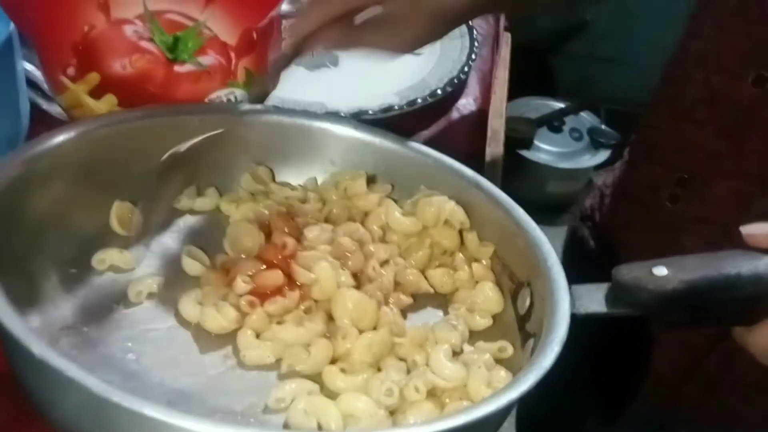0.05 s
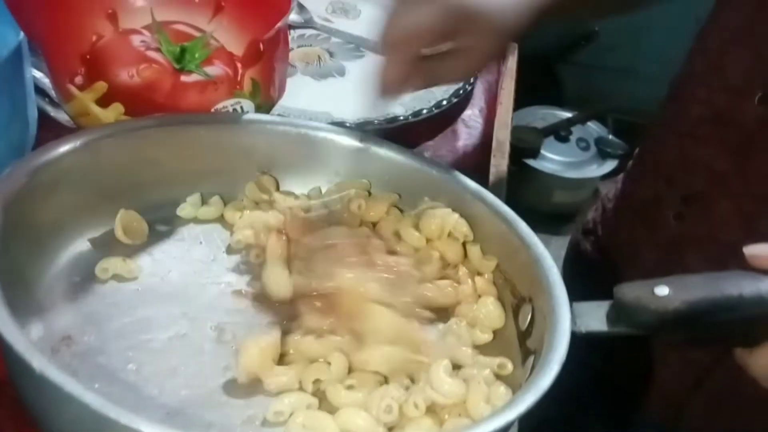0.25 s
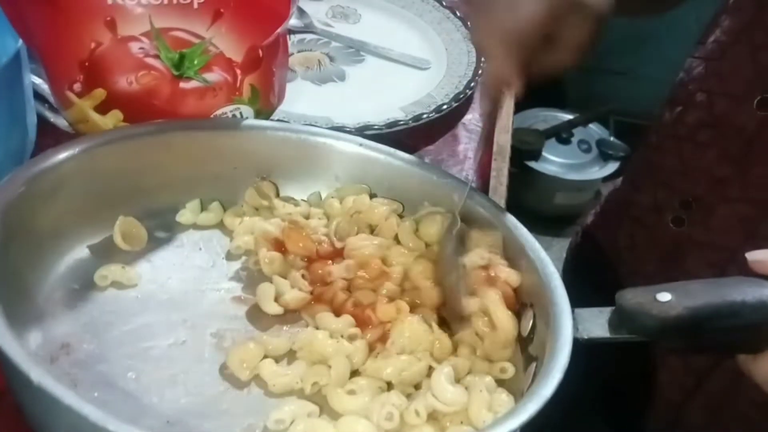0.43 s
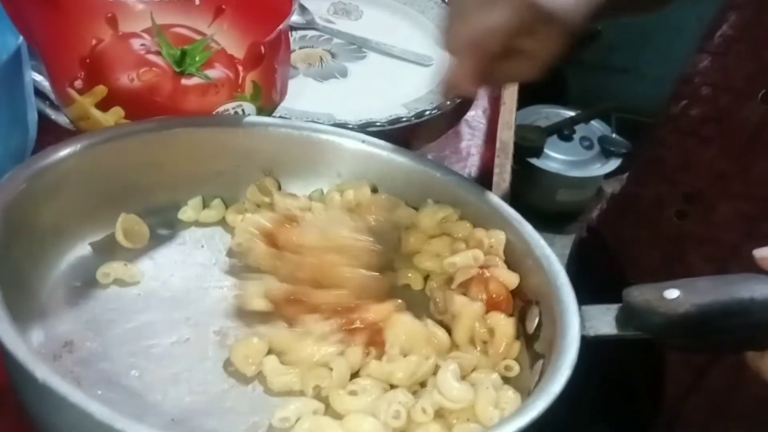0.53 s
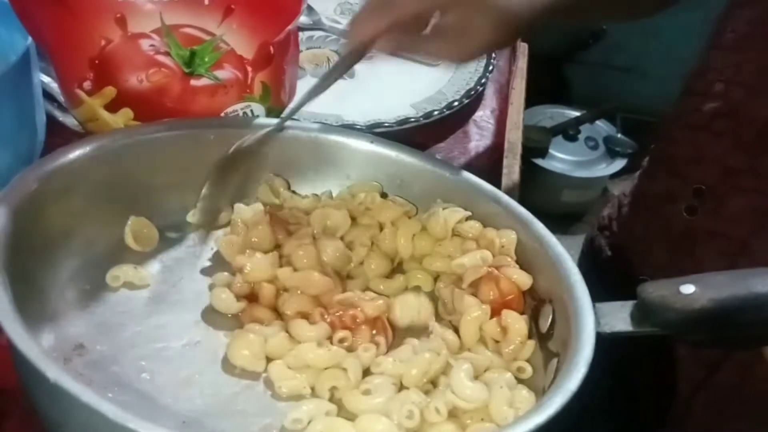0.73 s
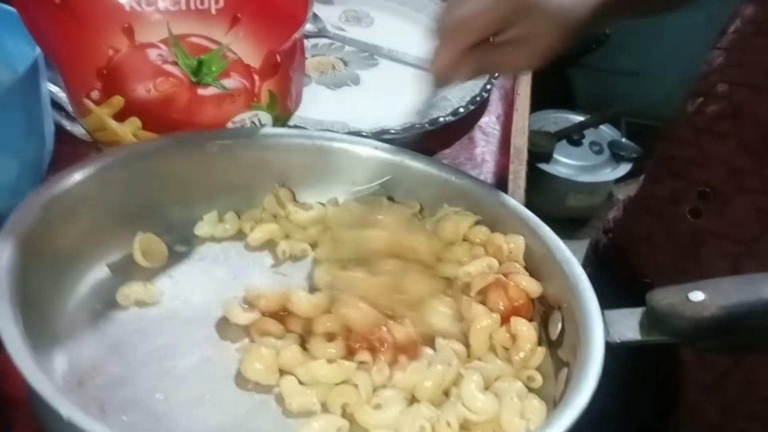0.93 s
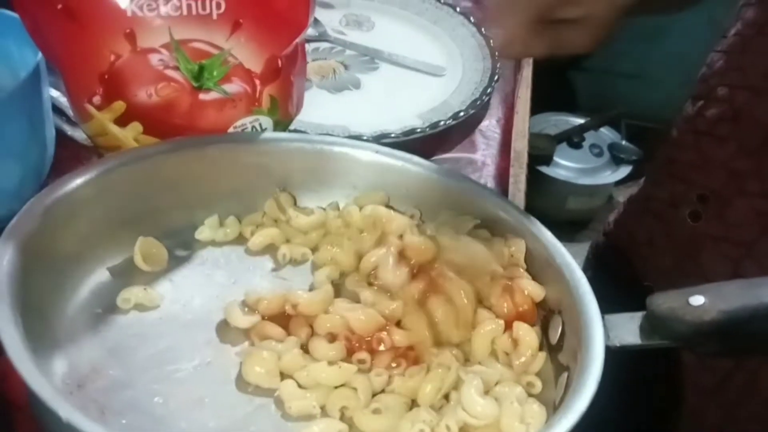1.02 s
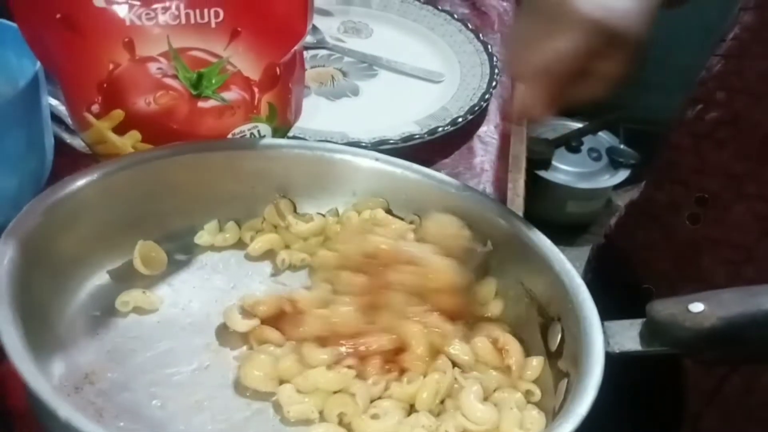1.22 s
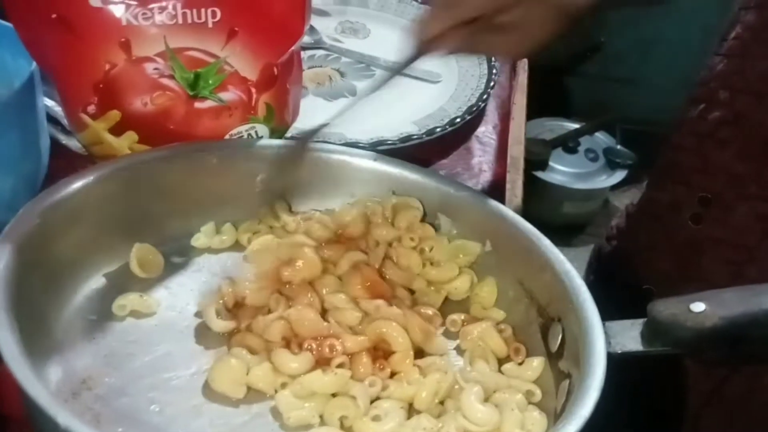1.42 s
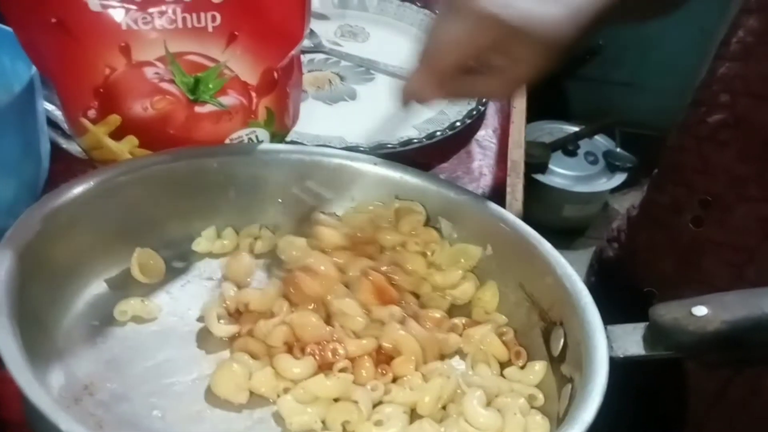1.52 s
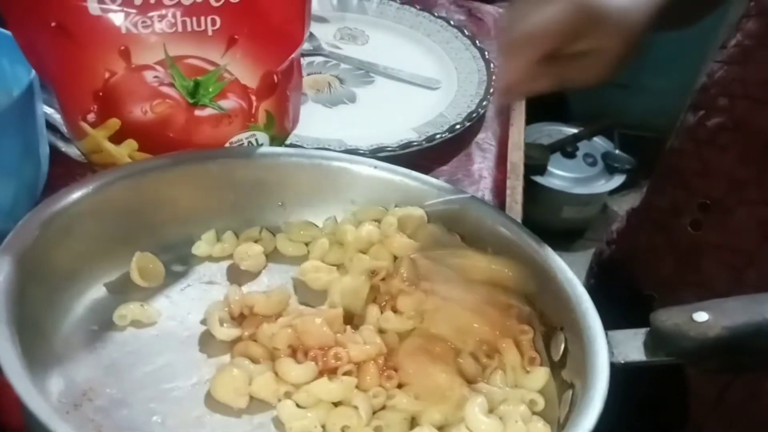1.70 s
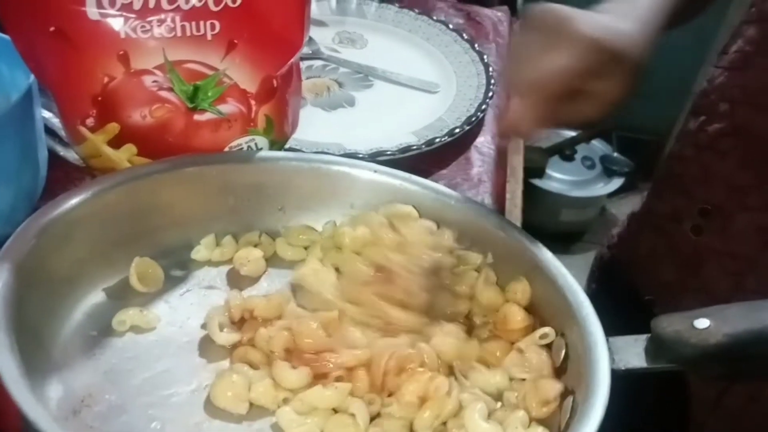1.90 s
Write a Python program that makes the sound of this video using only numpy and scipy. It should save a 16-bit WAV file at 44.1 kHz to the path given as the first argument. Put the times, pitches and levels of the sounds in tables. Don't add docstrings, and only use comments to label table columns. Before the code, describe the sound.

A metal spoon stirs pasta in a steel pan, heard close. A faint scrape tail dies first, then sharp, short-ringing knocks land near 0.2, 0.55, 0.86, 1.2 and 1.6 seconds, each followed by a brief gritty scrape. The second and third are hardest; the fourth is light and bounces until 1.28. Very faint pan hums and tiny wet clicks sit between, with a short kitchen tail, low rumble and hiss.

```python
import sys
import numpy as np
from scipy import signal
from scipy.fft import rfft, irfft
from scipy.io import wavfile
from scipy.ndimage import uniform_filter1d

SR = 44100
rng = np.random.default_rng(int(sys.argv[2]) if len(sys.argv) > 2 else 0)


def digitize_waveform(pressure):
    field = np.atleast_2d(pressure).T
    bounded = np.clip(field, -1, 1)
    quanta = np.round(bounded * 32767).astype(np.int16)
    wavfile.write(sys.argv[1], SR, quanta)


def decibels_to_gain(level_db):
    exponent = np.asarray(level_db, float) / 20
    return 10 ** exponent


N = 85995
PREROLL = 13230
RING_LEN = 8192

# start_s, peak_db, spot_index, thump_db, crack_db
KNOCKS = [
    (0.2147, -15, 0, -37, -20.5),
    (0.5459, -19, 1, -29, -23),
    (0.5485, -10, 1, -46, -20.5),
    (0.8642, -11.5, 2, -30, -17.5),
    (1.2069, -19, 3, -70, -25.5),
    (1.2292, -25, 3, -66, -27.5),
    (1.2615, -20, 3, -70, -22.5),
    (1.2778, -25, 5, -44.5, -28),
    (1.6160, -13, 4, -64, -24),
]
# pitch_hz, width_hz, level_db
SPOT_1 = [(1220, 90, 2), (1730, 50, -11), (2390, 41, 4), (4070, 33, -32.5), (5500, 37, -20),
          (6780, 78, 5.5), (8210, 45, 0.5), (9700, 34, -16), (13570, 170, -10)]
SPOT_2 = [(1420, 55, -5), (1854, 80, 3), (2235, 57, 0.5), (3140, 150, -10), (4860, 120, 3), (6610, 270, 8),
          (8340, 140, 0), (10430, 140, -15), (11100, 180, -13), (15590, 200, 8.5)]
SPOT_3 = [(1306, 90, 3), (2320, 110, -2), (3160, 73, -2), (4040, 145, -11), (4770, 47, 3.5), (5760, 67, 3),
          (7120, 210, -12), (8170, 95, -30), (9260, 110, -2.5), (10600, 190, -13), (12200, 82, -12),
          (14700, 98, -1.5)]
SPOT_4 = [(743, 48, -7), (2050, 32, -7.5), (2820, 62, 0.5), (4214, 45, -15.5), (5140, 87, -12.5),
          (6398, 150, -5.5), (7780, 90, -10), (8700, 120, -7.5), (9630, 80, -7.5), (10350, 110, -9),
          (11320, 220, -8), (12560, 110, -9)]
SPOT_5 = [(1250, 210, 4.5), (1730, 93, -6), (2234, 150, 2), (3860, 95, -12.5), (4770, 80, -27),
          (5740, 180, -27), (7060, 230, -17), (8450, 89, -21), (8820, 120, -18), (9400, 110, -29),
          (12000, 100, -8.5)]
SPOT_BOUNCE = [(2920, 110, -6), (3910, 87, -8), (4940, 76, -3), (5800, 100, 1), (6850, 92, -14),
               (8790, 88, 8), (9800, 86, -8)]
SPOTS = [SPOT_1, SPOT_2, SPOT_3, SPOT_4, SPOT_5, SPOT_BOUNCE]
# pitch_hz, density_db_per_hz
CRACK = [(400, -23), (900, -8.5), (1400, 0.5), (5250, -3.5), (7000, -0.5), (11000, -6), (16000, -2.5)]
# start_s, level_db, length_s
SLAP = (.8642, -11, 0.00036)
# pitch_hz, gain_db
BODY_CUT = [(250, -24), (600, -20), (760, -4), (900, -16), (1040, -11), (1150, 0)]

# start_s, length_s, level_db, brightness_db_per_octave, path_index
DRAGS = [
    (-.2, 0.16, -34.5, 0.5, 1),
    (0.214, 0.077, -27.5, -0.5, 0),
    (0.553, 0.081, -33, -1, 1),
    (.872, 0.1, -30.5, 0., 2),
    (1.211, 0.027, -39.5, 2, 3),
    (1.262, 0.072, -28.5, 0.07, 3),
    (1.617, 0.033, -28.5, -3, 4),
]
# start_s, change_db
CATCHES = [(0.237, -11), (.250, 2.5), (.2605, 0), (0.262, -5), (0.277, -5), (.293, -4), (0.31, -2),
           (0.556, -12), (0.57, 15), (0.591, 15), (.608, 9.5), (.655, 11), (0.878, -19), (0.888, 5),
           (0.8977, 12), (.912, -2), (0.9233, 12), (.942, 5), (0.958, 5.5), (0.977, 5), (1.266, -6),
           (1.287, -16), (1.245, 4), (1.296, 2), (1.3085, 8.5), (1.322, -11.5), (1.344, 0), (1.382, -11),
           (1.628, -12), (1.641, -3), (1.650, -1), (1.681, 17)]
# pitch_hz, width_hz, level_db
PATH_1 = [(695, 81, -18), (1244, 17, 0), (1385, 92, 1), (1803, 71, -1), (2440, 124, -6)]
PATH_2 = [(727, 44, -10), (1422, 25, -2), (1808, 62, 1), (2239, 46, 2), (2740, 34, -5), (3044, 48, -7.5),
          (2470, 60, -10)]
PATH_3 = [(660, 100, -25), (1103, 9.2, -22), (1466, 86, 1.5), (1576, 16, 2), (1830, 110, 2),
          (2333, 68, 1.5), (2465, 68, -4.5), (3030, 37, -8.5), (3320, 50, -5)]
PATH_4 = [(792, 30, -4), (1100, 130, -2.5), (1392, 75, -3), (1820, 52, 2), (2266, 53, -2.5),
          (1578, 57, -1.5), (2585, 34, -3.5), (3080, 110, -10)]
PATH_5 = [(706.5, 27, -2.5), (1350, 120, -2.5), (1830, 34, -12), (1830, 35, -4), (2280, 98, -4),
          (2720, 110, -6.5), (3130, 13, -3.5)]
PATHS = [PATH_1, PATH_2, PATH_3, PATH_4, PATH_5]
LOW_EDGE_HZ = [1070, 1320, 1110, 960, 1100]
# pitch_hz, width_hz, level_db
WALL = [(3925, 59, -2), (4795, 42, -0.5), (5827, 78, -1), (6900, 117, -4.5), (8130, 48, -6),
        (8750, 52, -15.5), (9330, 226, -6.5), (10690, 50, -8.5), (12260, 77, -14), (14600, 200, -6.5)]
# pitch_hz, density_db_per_hz
FLOOR = [(500, -115), (950, -1.5), (1200, -18), (2600, -0.5), (3600, -13), (8000, -19), (13500, -19),
         (15200, -43)]
# pitch_hz, t60_s
FLOOR_T60 = [(800, 0.088), (3000, 0.075), (15000, 0.084)]

# start_s, length_s, pitch_hz, level_db
HUMS = [(0.384, 0.1, 237.4, -51), (0.41, 0.11, 326.2, -58.5), (1.033, 0.25, 238.8, -54),
        (1.205, 0.13, 212.6, -51), (1.241, 0.05, 327, -50.5), (1.615, 0.077, 255, -49.5),
        (1.62, 0.055, 332, -50), (1.42, 0.083, 138.5, -60), (1.8, 0.11, 45, -61)]
# start_s, level_db
TICKS = [
    (1.043, -55),
    (1.548, -49),
    (1.865, -49),
]

# pitch_hz, t60_s
ROOM_T60 = [(500, 0.61), (1500, 0.47), (5000, 0.43), (14000, 0.23)]
# pitch_hz, density_db_per_hz
AIR = [(15, -44), (25, -37), (117, -1.5), (285, -10), (427, -14.5), (1190, -20.5), (1650, -15),
       (2350, -13.5), (16000, -31)]

# pitch_hz, gain_db
MIC = [(30, -16), (58, 1), (11500, -0.5), (13600, -5), (14900, -4.5), (15600, -3)]
# pitch_hz, share_0_to_1
NOISE_SHARE = [(4000, 0), (4600, .04), (7000, .02), (8000, .25), (11800, .2), (13000, .85), (14300, .85),
               (15000, .45)]
NOISY_KNOCKS = [.549, 1.262, 1.617]
DROPOUT_AT = [.2148, .5455, .863, 1.2065]
# pitch_hz, gain_db
DROPOUT_BAND = [(6000, -40), (8500, 0), (14000, 0), (15000, -20)]


def evened(x):
    return x / np.sqrt(np.mean(x ** 2) + 1e-20)


def read(points, hz):
    f, value = np.transpose(points)
    return np.interp(np.log(hz + 1), np.log(f + 1), value)


def colour(x, points):
    gain = decibels_to_gain(read(points, np.fft.rfftfreq(len(x), 1 / SR)))
    return irfft(rfft(x) * gain, len(x))


def add(mix, start_s, sound):
    part = mix[PREROLL + round(start_s * SR):][:len(sound)]
    part += sound[:len(part)]


def knock(peak_db, spot, thump_db, crack_db):
    contact_s, crack_t60, thump_hz, thump_t60 = 0.0017, 0.043, 88, 0.019
    t = np.arange(RING_LEN) / SR
    build_up = 1 - np.exp(-(t / contact_s) ** 2)
    fade = np.cos(np.pi / 2 * t / t[-1]) ** 2
    rung = colour(ring(spot, 1.4) * build_up, BODY_CUT) * fade
    crack = evened(colour(rng.standard_normal(len(t)), CRACK))
    crack = crack * np.minimum(t / 0.00075, 1) * decibels_to_gain(-60 * t / crack_t60)
    bent_t = t + 0.004 * (1 - np.exp(-t / 0.0025))
    push = np.sin(2 * np.pi * thump_hz * bent_t) * decibels_to_gain(-60 * t / thump_t60)
    return decibels_to_gain(peak_db) * 2 * rung / abs(rung).max() + decibels_to_gain(crack_db) * 2 * crack + decibels_to_gain(thump_db) * 2 * push


def slap(level_db, length_s):
    t = np.arange(2000) / SR
    u = t / length_s
    return decibels_to_gain(level_db) * (1 - u) * u * np.exp(-2 * u) * 10


def ring(modes, narrow):
    t = np.arange(RING_LEN) / SR
    f, width, db = np.transpose(modes)[:, :, None]
    width = width / narrow
    split = rng.uniform(0.12, 1.0, f.shape)
    lower = np.sin(2 * np.pi * (f - 1.83 * split * width) * t)
    upper = np.sin(2 * np.pi * (f + 0.39 * split * width) * t)
    h = (decibels_to_gain(db) * width * np.exp(-np.pi * width * t) * (lower + 1.9 * upper)).sum(0)
    return h / np.linalg.norm(h)


def drag(start, length, level_db, bright_db, path, edge_hz):
    t = np.arange(22050) / SR
    slips = slip_rain(len(t))
    press = pressing(t, start, length)
    edge = [(0.73 * edge_hz, -13), (edge_hz, 0)]
    walls = np.array(WALL) + rng.standard_normal((len(WALL), 1)) * [0, 0, 1.5]
    floor = colour(floor_modes(), edge) * np.hanning(2 * RING_LEN)[RING_LEN:]
    body = ring(walls, .95) + decibels_to_gain(-0.5) * floor + decibels_to_gain(3) * ring(path, 1.15)
    grit = colour(evened(colour(slips, FLOOR)), edge)
    out = signal.fftconvolve(slips * press, body)[:len(t)] + decibels_to_gain(-9) * grit * press
    return decibels_to_gain(level_db) * colour(out, BODY_CUT + [(2000, 0), (16000, 3 * bright_db)])


def slip_rain(count):
    slips_per_s, spread_db = 4000, 3.2
    size_db = spread_db * np.minimum(rng.exponential(1, count), 3)
    happens = rng.random(count) < slips_per_s / SR
    slips = evened(happens * decibels_to_gain(size_db) * rng.choice([-1., 1.], count))
    return slips / np.sqrt(uniform_filter1d(slips ** 2, size=800) + .1)


def pressing(t, start, length):
    rise_s, start_db, release_db_per_s, judder_db = .05, -3, 400, .4
    catch_rise_s, catch_fall_s = 0.00075, 0.004
    judder = uniform_filter1d(rng.standard_normal(len(t)), size=300)
    judder = evened(uniform_filter1d(judder, size=300))
    press_db = start_db * np.clip(1 - t / rise_s, 0, 1) * length / 0.091
    press_db = press_db - release_db_per_s * np.maximum(t - length, 0)
    at, change_db = np.transpose(CATCHES)
    since = np.maximum(start + t - at[:, None], 0)
    bump = (1 - np.exp(-since / catch_rise_s)) * np.exp(-since / catch_fall_s)
    press_db = press_db + change_db @ bump
    return decibels_to_gain(press_db + judder_db * judder) * np.minimum(t / 0.00037, 1)


def floor_modes(count=260):
    t = np.arange(RING_LEN) / SR
    u = rng.random((count, 3))
    f = (16000 * (np.arange(count) + u[:, 0]) / count)[:, None]
    t60 = read(FLOOR_T60, f)
    level = decibels_to_gain(read(FLOOR, f) + 4.4 * u[:, 1:2] - 60 * t / t60) / np.sqrt(t60)
    h = (level * np.sin(2 * np.pi * (f * t + u[:, 2:]))).sum(0)
    return h / np.linalg.norm(h)


def hum(length, hz, db):
    t = np.arange(0, length, 1 / SR)
    waver = 0.94 * np.sin(2 * np.pi * 9 * t + 6 * rng.random())
    return decibels_to_gain(db) * np.sin(np.pi * t / length) * np.sin(2 * np.pi * hz * t + waver)


def tick(level_db):
    t = np.arange(2000) / SR
    return np.sin(2 * np.pi * 15100 * t) * decibels_to_gain(level_db - 60 * t / .02)


def kitchen(x):
    taps = np.zeros(SR)
    at = np.arange(300, SR - 20, 20) + rng.integers(0, 20, (SR - 301) // 20)
    taps[at] = rng.choice([-1., 1.], at.shape)
    hz, t, z = signal.stft(taps, SR, nperseg=256)
    decay = decibels_to_gain(-60 * t / read(ROOM_T60, hz)[:, None])
    tail = signal.istft(z * decay, SR, nperseg=256)[1]
    return signal.fftconvolve(x, tail / np.linalg.norm(tail))[:len(x)]


def air():
    level_db, patch_db = -51, -1
    frames, hz = (N + PREROLL) // 256 + 5, np.fft.rfftfreq(1024, 1 / SR)
    a, b, patches = rng.standard_normal((frames, 513, 3)).T
    patches = uniform_filter1d(patches, size=6, axis=0)
    patches = evened(uniform_filter1d(patches, size=10, axis=1))
    z = (a + 1j * b) * decibels_to_gain(read(AIR, hz)[:, None] + patch_db * patches)
    hiss = signal.istft(z, nperseg=1024, noverlap=768)[1][:N + PREROLL]
    return decibels_to_gain(level_db) * evened(hiss)


def scene():
    mix = np.zeros(N + PREROLL)
    for s, peak_db, spot, thump_db, crack_db in KNOCKS:
        add(mix, s, knock(peak_db, SPOTS[round(spot)], thump_db, crack_db))
    slap_s, slap_db, slap_length = SLAP
    add(mix, slap_s, slap(slap_db, slap_length))
    for s, length, level_db, bright_db, path in DRAGS:
        i = round(path)
        add(mix, s, drag(s, length, level_db, bright_db, PATHS[i], LOW_EDGE_HZ[i]))
    for s, *row in HUMS:
        add(mix, s, hum(*row))
    for s, db in TICKS:
        add(mix, s, tick(db))
    mono = (mix + decibels_to_gain(-11.5) * kitchen(mix) + air())[PREROLL:]
    return np.array([mono, mono])


def noise_treble(x):
    clean_s = .022
    hz, t, z = signal.stft(x, SR, nperseg=256, noverlap=192)
    block, band = np.arange(len(t)) // 16, (np.arange(len(hz)) + 2) // 4
    luck = rng.standard_normal((block.max() + 1, band.max() + 1))
    luck = uniform_filter1d(luck, size=3, axis=0)
    rank = luck.argsort(0).argsort(0) / len(luck)
    swap = rank[block][:, band].T < read(NOISE_SHARE, hz)[:, None]
    for s, peak_db, *_ in KNOCKS:
        if peak_db > -23:
            swap[:, (t > s - clean_s) & (t < s + clean_s * .8)] = False
    for s in NOISY_KNOCKS:
        swap[hz > 4500] |= (t > s) & (t < s + .003)
    level = np.sqrt(uniform_filter1d(abs(z) ** 2, size=4, axis=1).clip(0))
    level = uniform_filter1d(level, size=5, axis=2)
    noise = signal.stft(rng.standard_normal(x.shape), SR, nperseg=256, noverlap=192)[2]
    noise /= np.sqrt(np.mean(abs(noise) ** 2))
    mixed = np.where(swap, level * noise, z)
    return signal.istft(mixed, SR, nperseg=256, noverlap=192)[1][:, :N]


def treble_dropout(x):
    t = np.arange(N) / SR
    dropped = sum((t > s - .012) & (t < s - .001) for s in DROPOUT_AT)
    depth = (1 - decibels_to_gain(-11)) * uniform_filter1d(dropped * 1., size=60)
    return x - depth * np.array([colour(side, DROPOUT_BAND) for side in x])


def band_limit(x):
    lowpass = signal.firwin(511, 15750, window=("kaiser", 9), fs=SR)
    low = signal.oaconvolve(x, lowpass[None], "same")
    return low + decibels_to_gain(-36) * (x - low)


def roll_off(x):
    return signal.sosfilt(signal.butter(12, 16810, fs=SR, output="sos"), x)


def record(dry):
    x = np.array([colour(side, MIC) for side in dry])
    x = treble_dropout(noise_treble(x))
    return roll_off(band_limit(x))


dry = scene()
out = record(dry)
digitize_waveform(out)
```